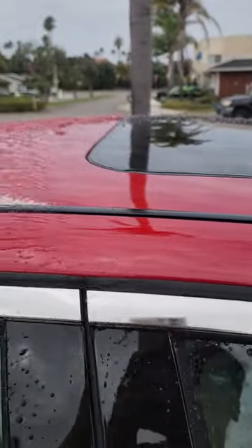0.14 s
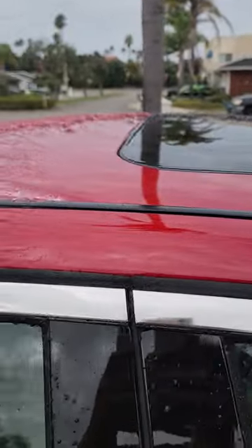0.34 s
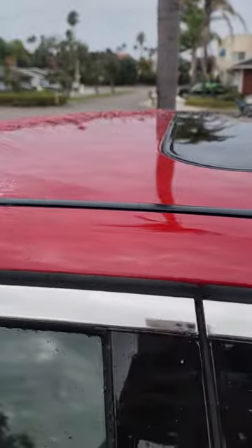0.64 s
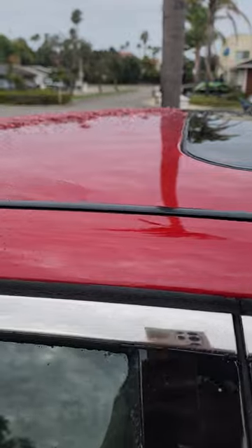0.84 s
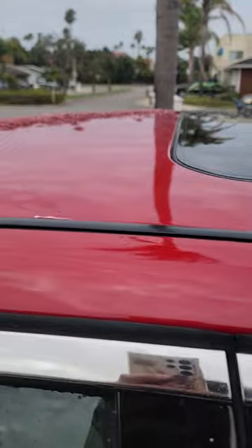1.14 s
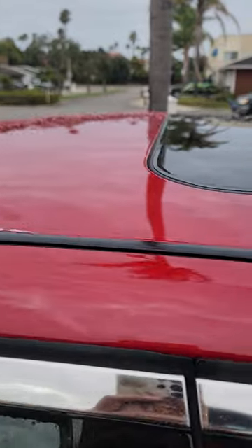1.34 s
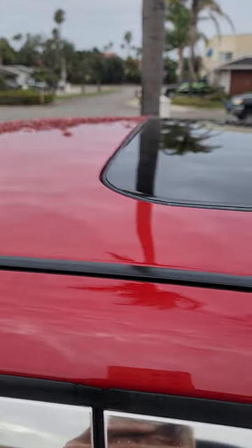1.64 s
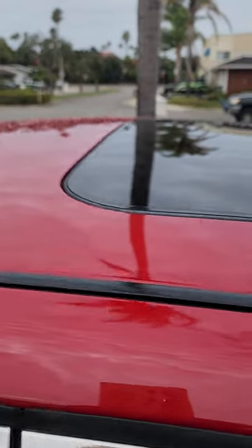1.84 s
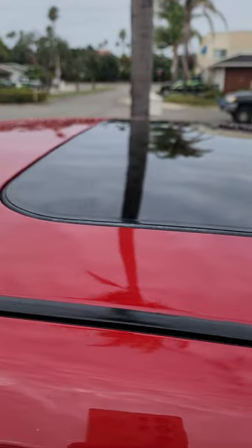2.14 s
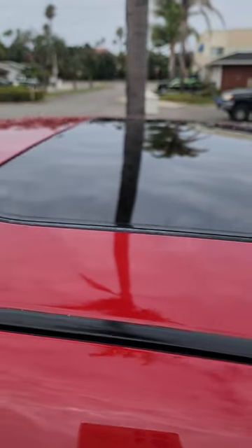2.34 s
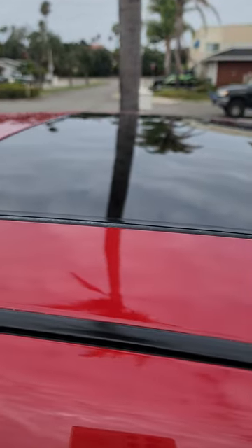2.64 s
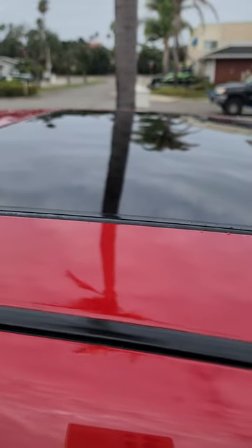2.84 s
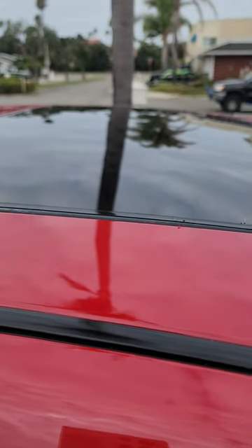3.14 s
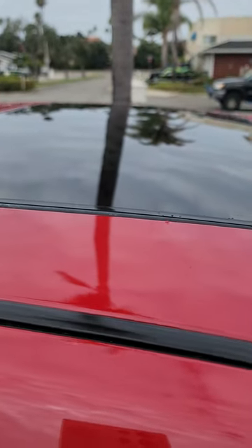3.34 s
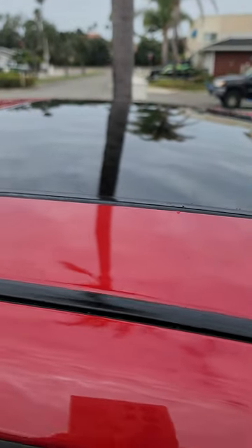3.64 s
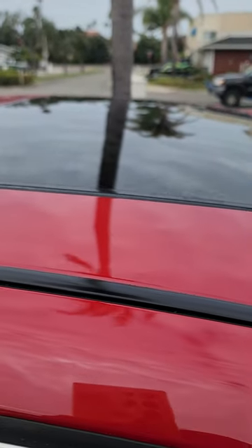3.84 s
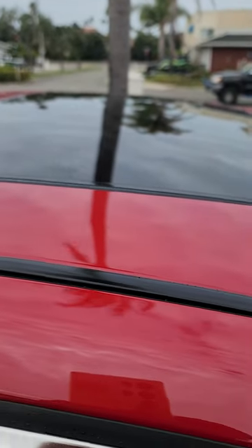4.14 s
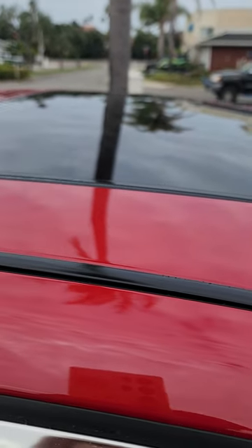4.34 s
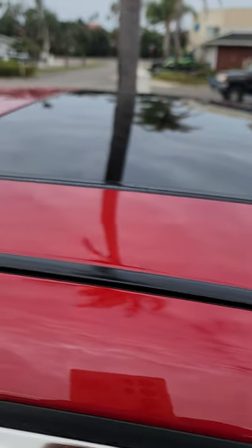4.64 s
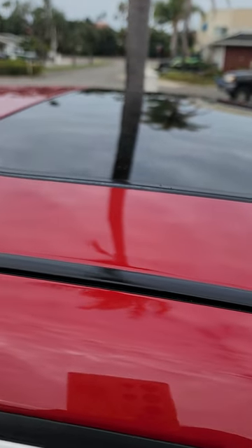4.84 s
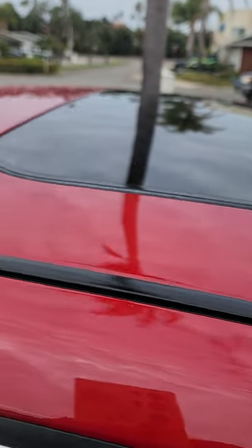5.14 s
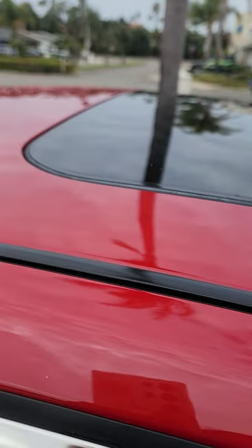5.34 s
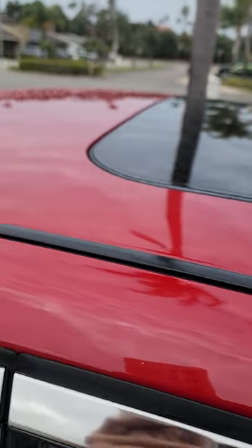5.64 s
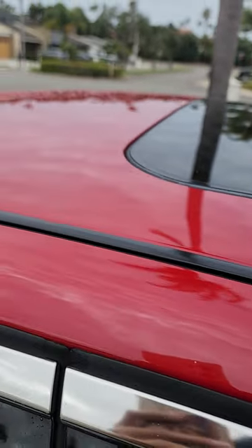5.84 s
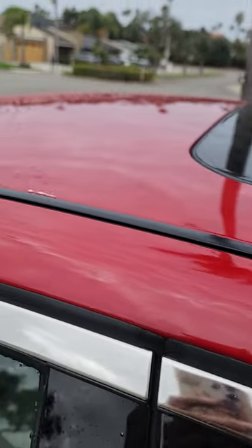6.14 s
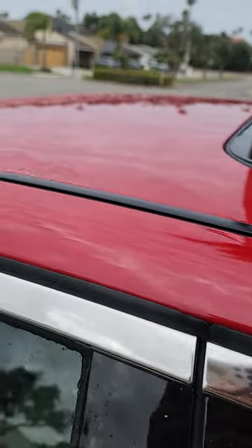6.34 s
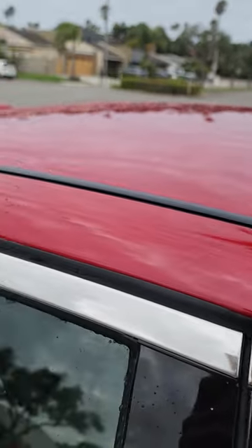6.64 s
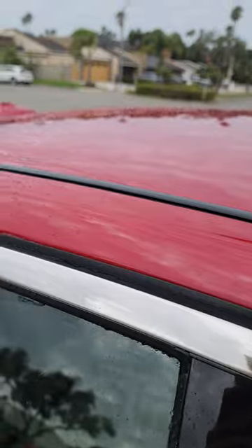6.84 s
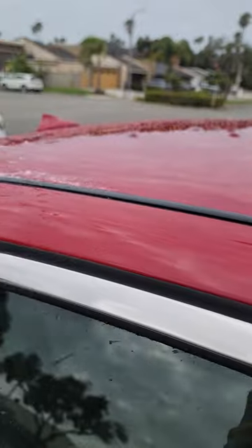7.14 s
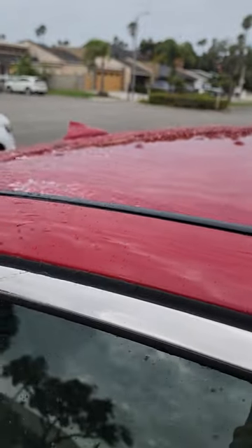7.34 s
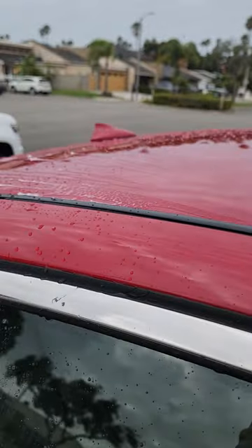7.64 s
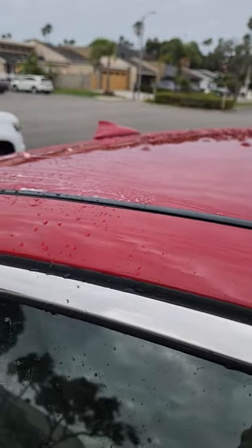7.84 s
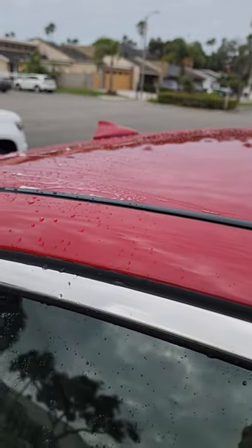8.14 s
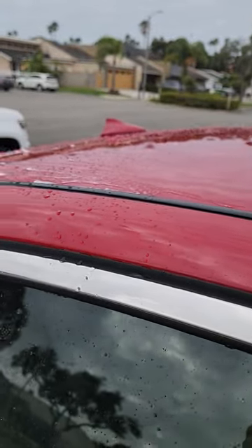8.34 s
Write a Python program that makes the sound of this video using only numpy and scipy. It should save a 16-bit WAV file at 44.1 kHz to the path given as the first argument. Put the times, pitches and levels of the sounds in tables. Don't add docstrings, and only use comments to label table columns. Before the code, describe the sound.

Close stereo phone pickup outdoors: a blower's air jet sweeps a wet car roof. It opens loud, hissing, howling in a trim seam and droning the panel, then eases to a softer rush. Bright hiss returns around four and five seconds, then uneven howling blasts with wind puffs on the microphone, a brief lull, and a final surge. A small engine idles and a fan whines faintly.

```python
import sys
import numpy as np
from scipy import signal
from scipy.fft import rfft, irfft, next_fast_len
from scipy.io import wavfile
from scipy.ndimage import uniform_filter1d, map_coordinates

SR = 44100
rng = np.random.default_rng(int(sys.argv[2]) if len(sys.argv) > 2 else 0)


def undo_db(level):
    steps = np.asarray(level, float) / 20
    return 10 ** steps


def bounce(signal):
    frames = np.transpose(np.atleast_2d(signal))
    limited = np.clip(frames, -1, 1)
    pcm = np.round(limited * 32767).astype(np.int16)
    wavfile.write(sys.argv[1], SR, pcm)


N = 374850
SIZE, HOP = 512, 128
HZ = np.fft.rfftfreq(SIZE, 1 / SR)
TIME = np.arange(N // HOP + 8) * HOP / SR


def unit(x):
    return x / np.sqrt(np.mean(x ** 2) + 1e-20)


def decibels(power):
    return 10 * np.log10(power)


def along(points, hz=HZ):
    f, v = np.transpose(points)
    return np.interp(np.log(hz + 1), np.log(f + 1), v)


def curves(rows, t=TIME):
    s, *cols = np.transpose(rows)
    return [np.interp(t, s, c) for c in cols]


def wobble(rate, t=TIME):
    knots = rng.standard_normal(int(N * rate / SR) + 9)
    return map_coordinates(knots, [t * rate])


def spells(start, end, first_db, last_db, rise, fall, t=TIME):
    start, end, first_db, last_db = np.array([start, end, first_db, last_db])[:, :, None]
    progress = np.clip((t - start) / (end - start), 0, 1)
    held_db = first_db + (last_db - first_db) * progress
    swell_db = rise * np.maximum(start - t, 0)
    decay_db = fall * np.maximum(t - end, 0)
    return undo_db(2 * (held_db - swell_db - decay_db))


def density(db, width_hz):
    return undo_db(db) * np.sqrt(SR / 2 / width_hz)


def resonance(hz, width_hz):
    shape = 1 / (1 + ((HZ[:, None] - hz) / (width_hz / 2)) ** 2)
    return shape / np.sqrt(np.mean(shape ** 2, axis=0))


# pitch_hz, lead_rad
PORT_LEAD = [(300, 0.16), (900, 0.75), (1300, 0.7), (2200, 1.5), (3000, 1.5), (4200, 2.5), (5200, 3),
             (6200, 4), (7500, 4.5), (8500, 7.5), (9500, 7.5), (11000, 7), (13000, 8), (16000, 10)]
# pitch_hz, tilt_db
PORT_TILT = [(300, -2), (700, 4.5), (1000, -2.5), (1500, 7.5), (2000, -1), (2600, 8), (3500, 4),
             (4500, -0.5), (6500, 0), (7500, -1.5), (8500, -4), (9600, 6.5), (11500, -4.5), (15500, -5)]


def ports(gain, alike, lead_s, patchy_db):
    noise = rng.standard_normal((2, (len(TIME) - 1) * HOP))
    a, b = signal.stft(noise, nperseg=SIZE, noverlap=SIZE - HOP)[2]
    patches = uniform_filter1d(uniform_filter1d(rng.standard_normal(a.shape), 5, 0), 20, 1)
    turn = np.arccos(np.clip(alike, 0, 1)) / 2
    mid, side = np.cos(turn) * a, np.sin(turn) * b
    lead = along(PORT_LEAD)[:, None] + 2 * np.pi * HZ[:, None] * lead_s
    swing_rad, swing_width_rad = .95, .3
    off = (lead - np.pi) / swing_width_rad
    phase = lead + swing_rad * off * np.exp(-off ** 2 / 2)
    half = undo_db(along(PORT_TILT) / 2)[:, None] * np.exp(.5j * phase)
    pair = np.array([(mid + side) * half, (mid - side) / half])
    pair = gain * undo_db(patchy_db * unit(patches)) * pair
    return signal.istft(pair, nperseg=SIZE, noverlap=SIZE - HOP)[1][:, :N]


# delay_ms, drift_ms, left_strength, right_strength
ECHOES = [
    (.952, .014, .16, .22),
    (1.25, .14, .2, .2),
    (1.65, .2, .16, .16),
]


def echoes(share):
    comb = np.ones((2, len(HZ), len(TIME)), complex)
    for ms, drift_ms, *strength in ECHOES:
        delay_s = 0.000991 * (ms + drift_ms * wobble(1.5))
        depth = np.multiply.outer(strength, share)[:, None]
        comb += depth * np.exp(-2j * np.pi * HZ[:, None] * delay_s)
    return comb


# time_s, hiss_db, body_re_hiss_db (lower body of the rush)
SCATTER = [(0, -30, -6), (1, -28.5, 2.5), (1.3, -27.5, -7), (1.55, -21, -10), (1.9, -23.5, -7.5),
           (2.65, -22.5, -6.5), (3.55, -21.5, -5.5), (4.2, -24, -4.5), (4.6, -26, -5), (4.88, -23, -5.5),
           (5.76, -27.5, -3), (5.85, -29, -3.5), (6.06, -24.5, -4.5), (6.2, -22, -5.5), (7.6, -35.5, 5),
           (7.74, -37.5, 3.5), (8.0, -34, -7.5), (8.5, -25.5, -5)]
# start_s, end_s, first_hiss_db, last_hiss_db, brightness_db
STROKES = [(0, 0.826, -15.5, -16, -5.5), (0.85, 0.954, -16.5, -27, -10), (3.593, 3.658, -22.5, -20.5, 3),
           (3.683, 3.926, -17, -13.5, 1), (3.946, 4.19, -14, -16.5, -1.5), (4.21, 4.318, -17.5, -26, -1),
           (4.408, 4.48, -26, -23.5, 1), (4.913, 4.975, -26, -20, 7), (5, 5.354, -15.5, -17.5, 4.5),
           (5.38, 5.797, -16, -17, 3.5), (6.102, 6.204, -15, -16.5, 0.5), (6.216, 6.39, -21.5, -23, -2),
           (6.418, 6.616, -13.5, -17, -3.5), (6.64, 7.203, -17.5, -20, -2), (7.214, 7.62, -20, -17.5, -4),
           (7.636, 7.696, -19.5, -26.5, -6), (8.304, 8.345, -30, -16, -10), (8.364, 8.5, -15.5, -18.5, -1)]


def aim():
    turn_in, turn_out = 360, 390
    scatter_top_db, scatter_gap_db, scatter_share = 1, -7.5, 0.093
    far = undo_db(2 * curves(SCATTER)[0])
    start, end, first_db, last_db, bright_db = np.transpose(STROKES)
    near = spells(start, end, first_db, last_db, turn_in, turn_out)
    side_db = -30.5 + 1.37 * bright_db + 0.27 * (np.array([first_db, last_db]) + 8.5)
    flank = spells(start, end, *side_db, turn_in, turn_out)
    hiss = far + near.sum(0)
    top = far * undo_db(2 * scatter_top_db) + undo_db(2 * bright_db) @ near
    gap = far * undo_db(2 * scatter_gap_db) + flank.sum(0)
    direct = .69 - .03 * bright_db
    share = (far * scatter_share + direct @ near) / hiss
    return decibels(hiss), decibels(top), decibels(gap), np.clip(share, 0, 1)


# pitch_hz, level_db
DIRECT_COLOUR = [(300, -1.5), (3000, -2.5), (3600, 1.5), (4400, -1), (5500, -2), (7500, 4.5), (8500, 0),
                 (9800, -4.5), (10600, -0.5), (11500, -0.5), (15800, -2)]
# pitch_hz, level_db
SCATTER_COLOUR = [(300, 1.5), (3000, -2.5), (3600, 1), (4400, 1), (5500, -3.5), (7500, -2), (8500, -5),
                  (9800, -15.5), (10600, -11), (11500, -4.5), (15800, -3)]


def paint_hiss(hiss_db, top_db, gap_db, share):
    panel_db = sum(curves(SCATTER))
    seam_db = panel_db + 1.5
    # pitch_hz, level_db, width_hz
    anchors = [(350, panel_db - 14, 300), (430, panel_db, 1020), (1130, panel_db, 920),
               (1970, seam_db, 1030), (3210, gap_db, 2550), (4920, hiss_db, 4500),
               (7800, hiss_db, 4270), (10800, top_db, 6000)]
    levels = np.log([density(db, width) for _, db, width in anchors])
    index = np.arange(len(anchors))
    place = np.interp(np.log(HZ + 1), np.log([a[0] for a in anchors]), index)
    weights = np.clip(1 - np.abs(place[:, None] - index), 0, 1)
    colour_db = np.outer(along(DIRECT_COLOUR), share) + np.outer(along(SCATTER_COLOUR), 1 - share)
    flutter_db = .5 * wobble(14) + 0.096 * wobble(40)
    return np.exp(weights @ levels) * undo_db(colour_db + flutter_db) * (HZ[:, None] > 200)


# start_s, end_s, level_db, pitch_hz, width_hz
HOWLS = [(0, 0.854, -20, 1875, 900), (0.907, 1.112, -21, 1950, 302), (1.2, 1.75, -35.5, 1950, 200),
         (0.85, 0.945, -33, 2950, 1400), (3.47, 3.82, -29, 1510, 905), (3.985, 4.068, -25.5, 2040, 450),
         (4.94, 5.106, -26, 1510, 700), (6.26, 6.347, -13, 2000, 630), (6.277, 6.452, -27, 3100, 1510),
         (6.38, 6.56, -17, 1970, 764), (6.59, 6.985, -19.5, 1780, 920), (7.044, 7.514, -20, 1940, 980),
         (7.535, 7.732, -19, 2010, 633), (7.524, 7.65, -26.5, 3100, 1500), (8.288, 8.5, -16, 2020, 770)]


def seam_howl():
    start, end, db, hz, width_hz = np.transpose(HOWLS)
    locks = spells(start, end, db, db, rise=237, fall=145)
    unsteady_db = 2.0 + 0.91 * wobble(25) + 1.2 * wobble(7)
    return resonance(hz, width_hz) ** 2 @ locks * undo_db(unsteady_db)


# start_s, end_s, drone_db, roar_db
PRESSES = [
    (0, 0.437, -20.5, -18.5),
    (0.533, .8, -23.5, -20),
    (3.95, 4.22, -40, -27.5),
    (6.302, 6.7, -34.5, -30),
    (6.9, 7.47, -26, -27.5),
    (8.307, 8.5, -32, -38),
]


def panel_drone():
    start, end, db, _ = np.transpose(PRESSES)
    pressed = spells(start, end, db, db, rise=66, fall=66).sum(0)
    return pressed * undo_db(-3.0 + 4.3 * wobble(6.2)) * resonance(784, 600) ** 2


# pitch_hz, likeness (0-1)
DIRECT_LIKENESS = [(300, .85), (900, .9), (2200, .75), (3600, .6), (4400, .93), (5300, .985), (6100, .86),
                   (7500, .85), (9300, .55), (12000, .72), (16000, .65)]
# pitch_hz, likeness (0-1)
SCATTER_LIKENESS = [(300, 0.54), (900, 0.86), (2200, 0.33), (3200, 0.79), (16000, .05)]
# time_s, extra_left_lead_us, focus (point-like, 0-1)
BEARING = [(0.2, 0, .82), (.33, 8, 1), (.55, 15, 1), (.88, 14, 1), (1.1, 14, .7), (3.72, -17, .8),
           (3.86, 8, 1), (4.02, 16, .93), (4.2, 10, .93), (5.1, 5, .92), (5.42, 2, .9), (5.58, -3, 1),
           (6.16, 10, 1), (6.45, -3, .88), (6.63, -3, 1), (6.77, 7, 1), (7.05, 2, .93), (7.3, -21, .8)]


def jet():
    hiss_db, top_db, gap_db, share = aim()
    lead_us, focus = curves(BEARING)
    direct = focus * np.clip(3 * share - .6, 0, 1)
    alike = np.outer(along(SCATTER_LIKENESS), 1 - direct) + np.outer(along(DIRECT_LIKENESS), direct)
    comb = echoes(.35 + .75 * share)
    broad = paint_hiss(hiss_db, top_db, gap_db, share)
    hiss = ports(comb * broad, alike, lead_s=1e-6 * lead_us, patchy_db=0.57)
    tonal = np.sqrt(seam_howl() + panel_drone())
    locked = ports(comb * tonal, alike=1.0, lead_s=0, patchy_db=1)
    return hiss + locked


def coloured(spectrum):
    m = next_fast_len(N)
    white = rfft(rng.standard_normal((2, m)))
    gain = undo_db(along(spectrum, np.fft.rfftfreq(m, 1 / SR)))
    return unit(irfft(white * gain, m)[:, :N])


# pitch_hz, level_db
ROAR_COLOUR = [(60, -38), (110, -4), (170, 0.5), (300, -2.5), (420, -3), (600, -25)]


def low_roar():
    t = np.arange(N) / SR
    rush_db = sum(curves(SCATTER, t)) + 30
    start, end, _, db = np.transpose(PRESSES)
    idle_db = -27 + 0.1 * rush_db
    pressed = spells(start, end, db, db, rise=66, fall=66, t=t).sum(0)
    roar_db = decibels(undo_db(2 * idle_db) + pressed)
    common, apart = coloured(ROAR_COLOUR)
    return undo_db(roar_db - 4.5) * np.array([common + 0.45 * apart, common - 0.25 * apart])


# pitch_hz, level_db
BUFFET_COLOUR = [(15, -30), (30, -12), (50, -3.5), (100, -2.5), (140, -8), (250, -11.5), (500, -55)]
# start_s, end_s, level_db
GUSTS = [
    (0.2, .35, -33),
    (3.35, 4.25, -34),
    (5.31, 5.7, -28),
    (5.8, 6.2, -29.5),
    (6.327, 6.616, -23.5),
    (6.7, 7.3, -32),
    (7.402, 7.825, -29),
    (8.263, 8.5, -29.5),
]


def buffeting():
    t = np.arange(N) / SR
    rush_db = sum(curves(SCATTER, t)) + 30
    calm_db = -36.5 + 1.1 * rush_db
    start, end, db = np.transpose(GUSTS)
    gusts = spells(start, end, db, db, rise=90, fall=90, t=t).sum(0)
    buffet_db = decibels(undo_db(2 * calm_db) + gusts)
    lumps_db = 4.7 * np.array([wobble(14, t), wobble(16, t)])
    common, apart = coloured(BUFFET_COLOUR) * undo_db(lumps_db)
    unlike = np.clip(.2 + .05 * (buffet_db + 36), .15, 1)
    return undo_db(buffet_db) * np.array([common + unlike * apart, common - unlike * apart])


def hum(orders, hz, level_db, drift, sway_db):
    t = np.arange(N) / SR
    turns = np.cumsum(hz * (1 + drift * wobble(1.499, t))) / SR
    pair = np.zeros((2, N))
    for order, db in orders:
        tone = 2 * np.pi * (round(order) * turns + rng.random())
        lead = along(PORT_LEAD, order * hz) / 2
        strength = undo_db(db + 2.5 + level_db + sway_db * wobble(1.277, t))
        pair += strength * np.sin([tone + lead, tone - lead])
    return pair


# order, level_db
ENGINE_ORDERS = [(3, -41), (4, -43), (5, -31.5), (6, -38.5), (8, -35), (9, -39), (10, -38.5), (12, -51)]


def idling_engine(path_db):
    idle_hz = 28.285
    upper = hum(ENGINE_ORDERS, idle_hz, 0.19 * path_db, drift=0.00202, sway_db=1.5)
    thump = hum([(2, -40.5)], idle_hz, path_db, drift=0.002, sway_db=2.0)
    return upper + thump


# order, level_db
FAN_ORDERS = [(1, -42), (2, -42), (9, -59)]


def blower_fan(path_db):
    return hum(FAN_ORDERS, 503.3, path_db, drift=0.00034, sway_db=0.7)


# time_s, level_db, pitch_hz, left_right_db
PUFFS = [
    (5.37, -15.5, 150, 17),
    (5.52, -19, 90, -2),
    (6.22, -9.5, 120, 5),
    (6.335, -14, 168, 12),
    (7.2, -13, 100, -13),
]


def puffs():
    out = np.zeros((2, N))
    t = np.arange(-.03, .03, 1 / SR)
    for s, db, hz, pan_db in PUFFS:
        push = undo_db(db) * np.exp(-(t / 0.0055) ** 2) * np.sin(2 * np.pi * hz * t)
        first = round(s * SR) - len(t) // 2
        out[:, first:first + len(t)] += undo_db([[pan_db / 2], [-pan_db / 2]]) * push
    return out


# time_s, engine_db, blower_db
OPEN_PATH = [(0.6, -6, 0), (1.3, 5, -1), (2.2, 3, -0.5), (3.6, 2, 4.5), (4.6, -1, 1), (5.4, 4, -1),
             (6.1, 11, 5), (6.8, -7, 0.5), (7.8, 3, -1.5), (7.95, -16, -4), (8.5, -10, 5)]


def scene():
    engine_db, fan_db = curves(OPEN_PATH, np.arange(N) / SR)
    air = jet() + low_roar() + buffeting()
    machines = idling_engine(engine_db) + blower_fan(fan_db)
    return air + machines + puffs()


def low_pass(x):
    return signal.sosfilt(signal.butter(12, 15745, fs=SR, output="sos"), x)


def record(dry):
    m = next_fast_len(N)
    soft = dry / (1 + np.abs(dry) ** 6) ** (1 / 6)
    passband = np.fft.rfftfreq(m, 1 / SR) < 15745
    mix = irfft(rfft(soft, m) * passband, m)[:, :N]
    return low_pass(mix)


dry = scene()
out = record(dry)
bounce(out)
```